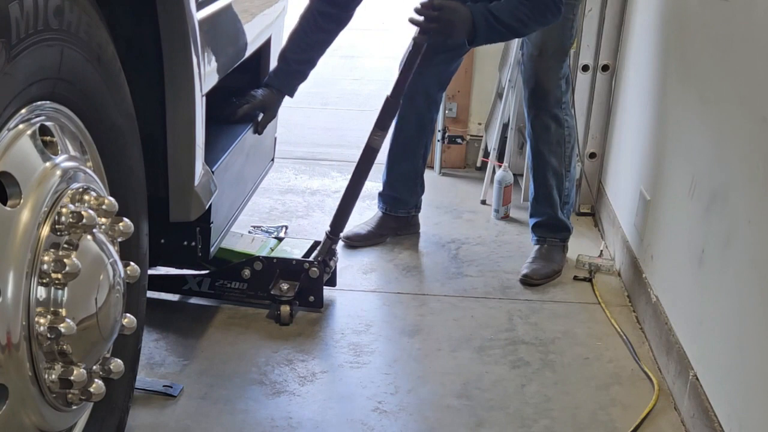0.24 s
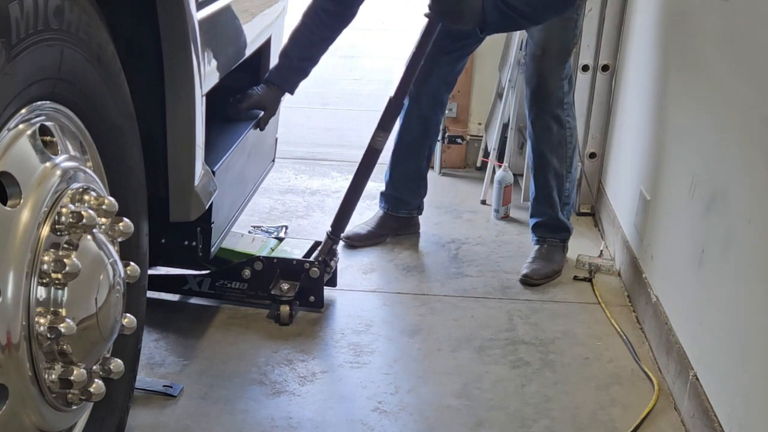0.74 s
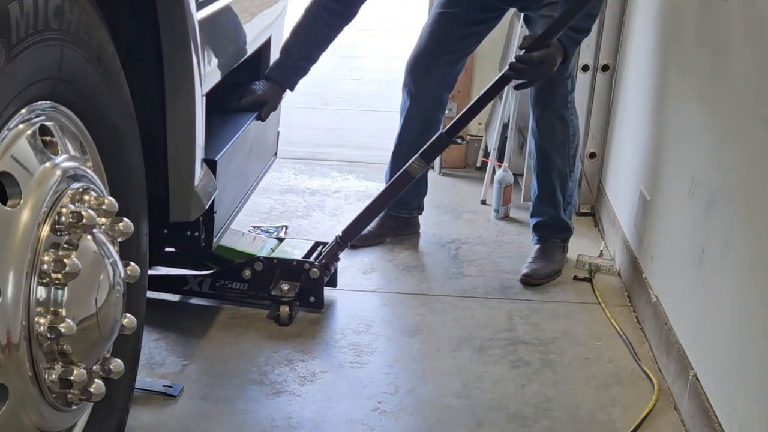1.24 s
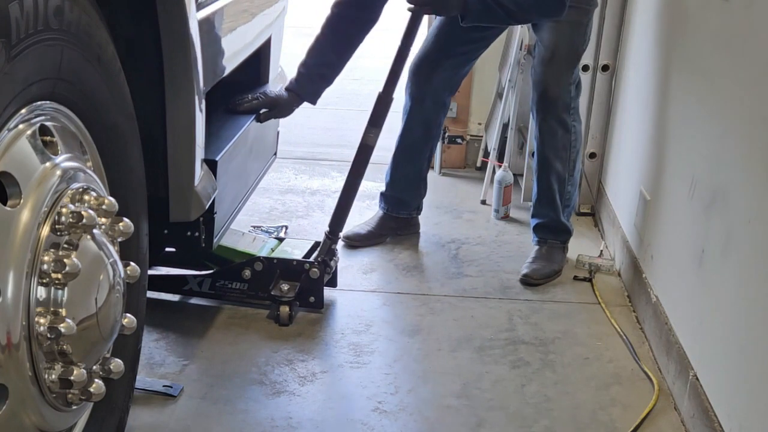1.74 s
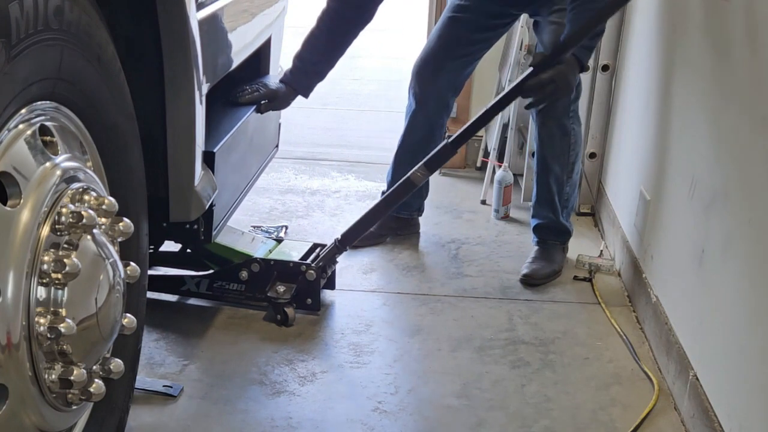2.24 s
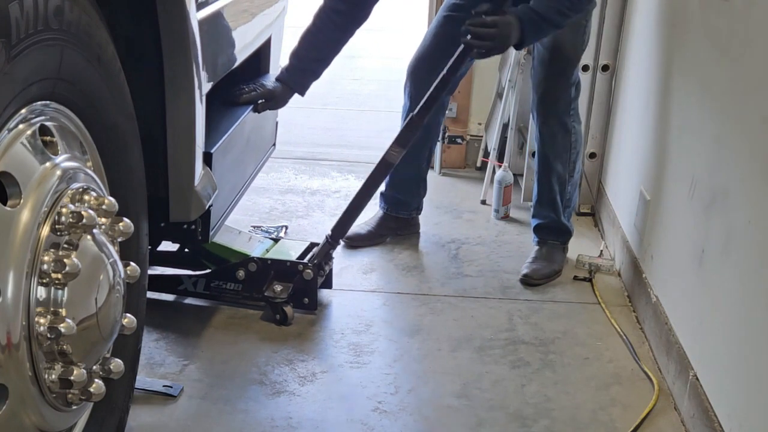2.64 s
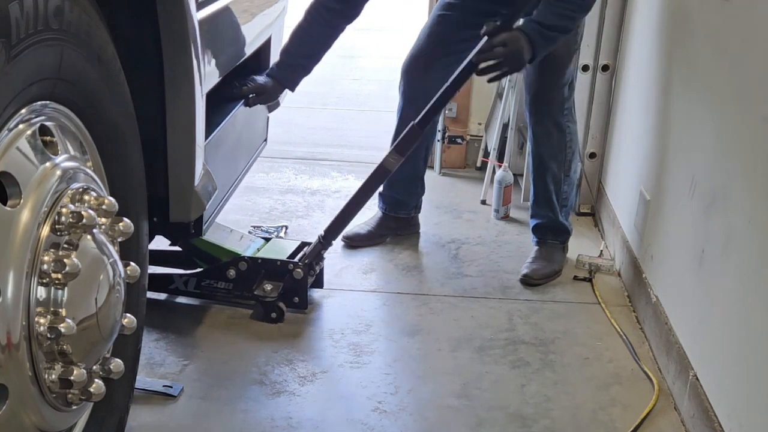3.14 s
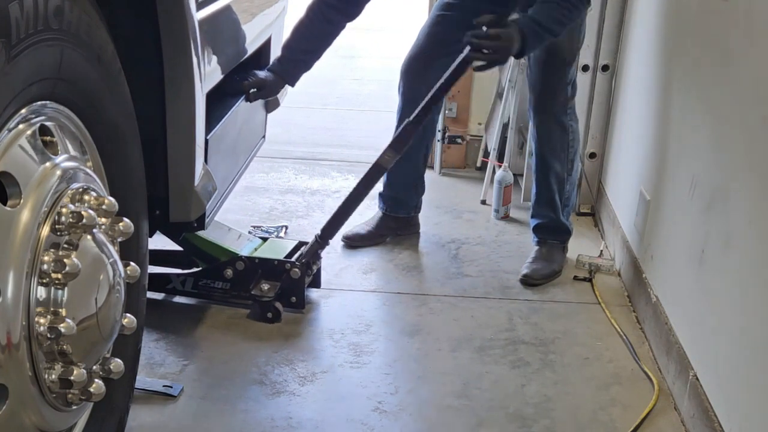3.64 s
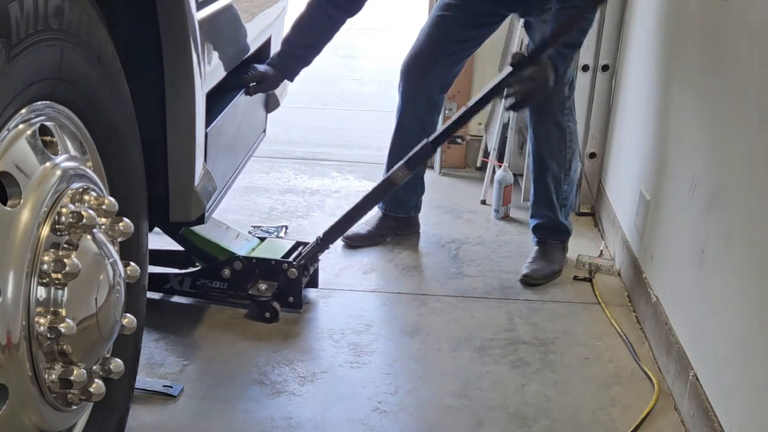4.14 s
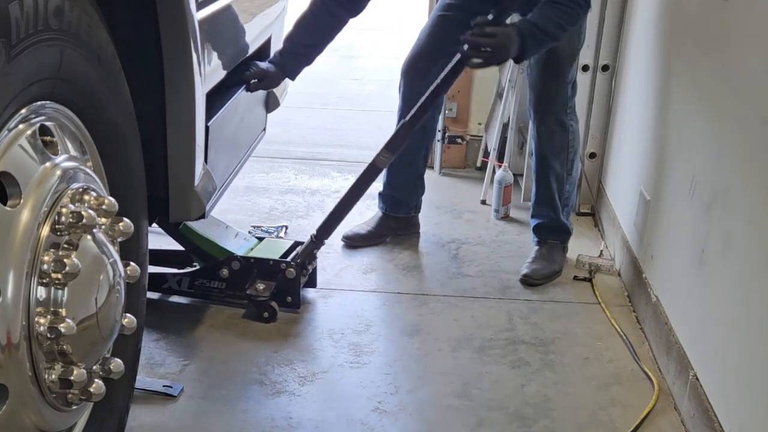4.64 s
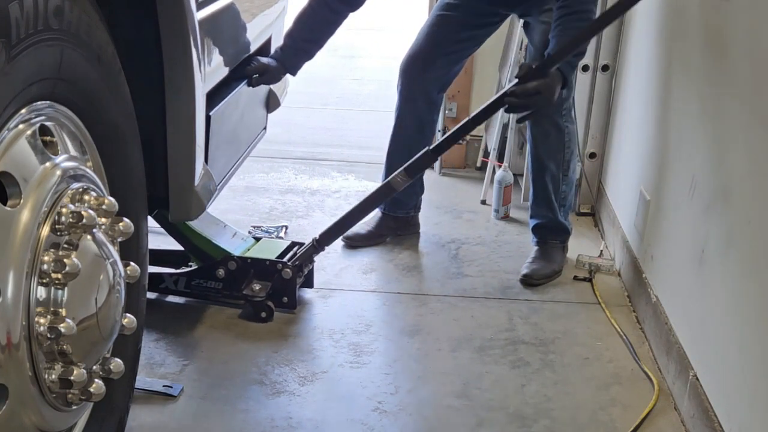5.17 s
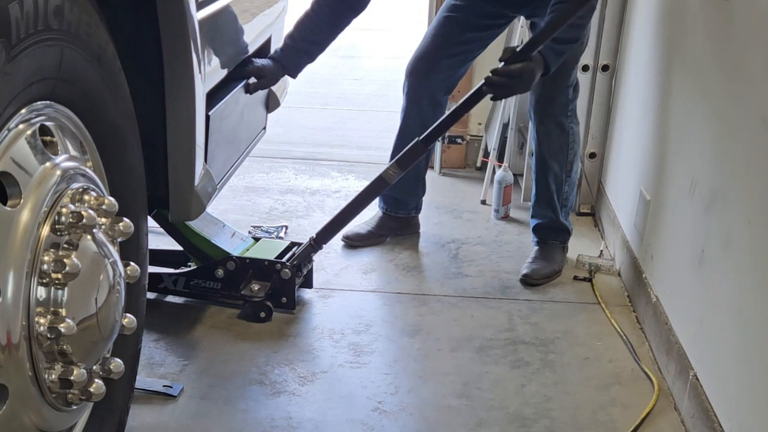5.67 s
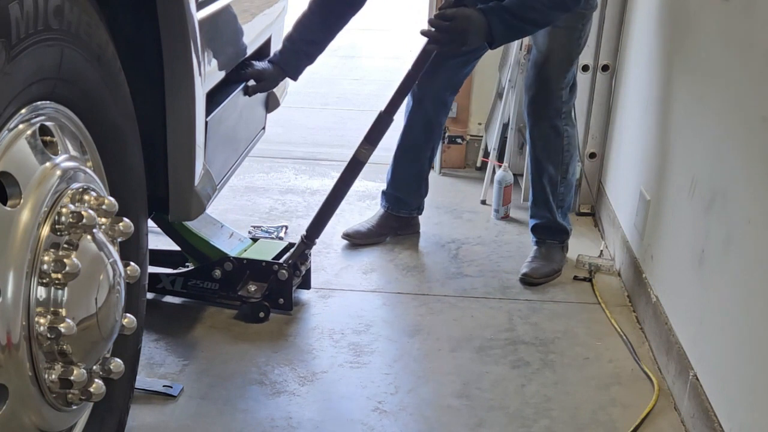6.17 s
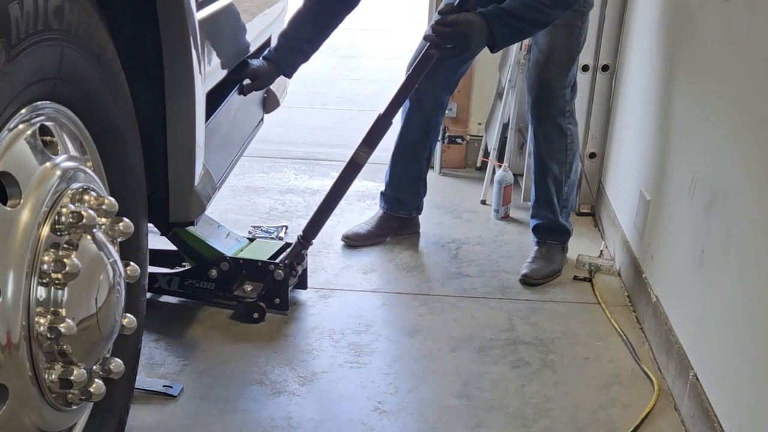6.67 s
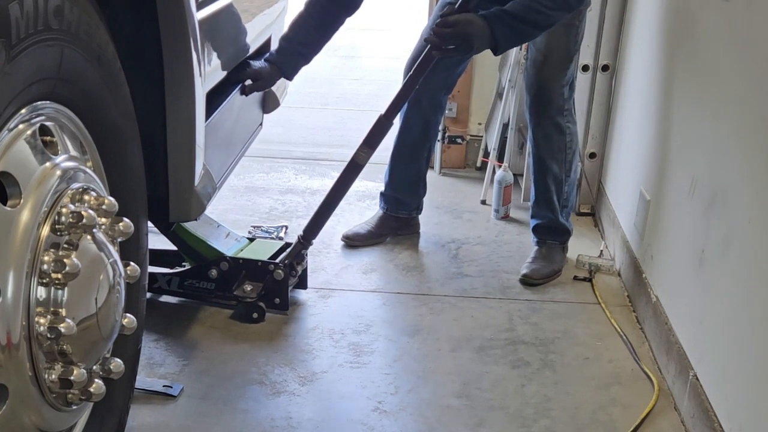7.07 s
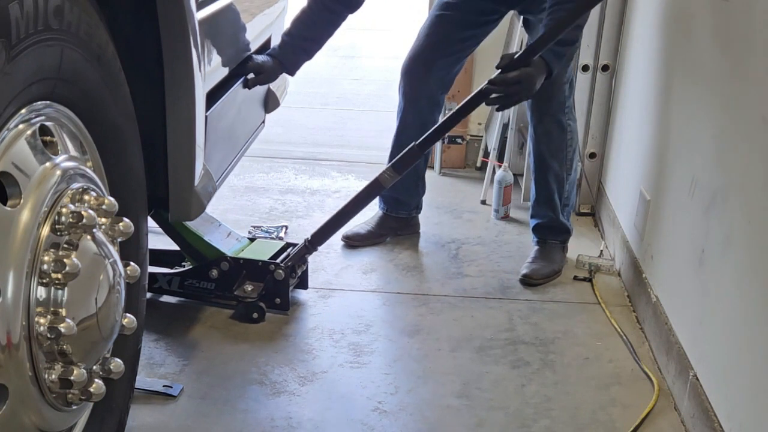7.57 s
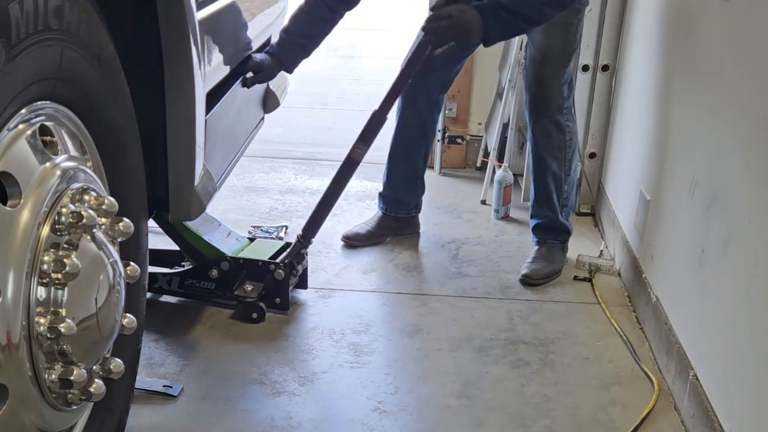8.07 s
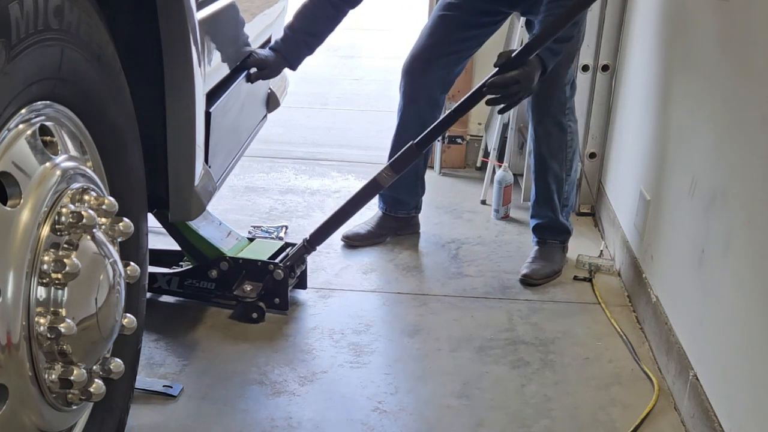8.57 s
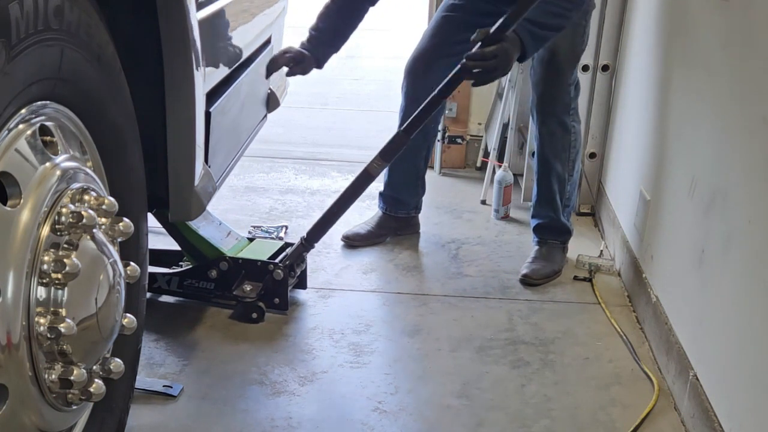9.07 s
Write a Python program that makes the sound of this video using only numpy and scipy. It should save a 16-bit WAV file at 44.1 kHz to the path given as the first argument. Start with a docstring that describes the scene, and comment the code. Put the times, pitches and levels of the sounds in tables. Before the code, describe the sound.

A trolley jack is pumped under a large vehicle's steel side box, heard closely in stereo with short garage echoes. Quiet room air and a faint hum lie beneath. A handle clunk at 0.6 s leads to a clack, then a thud, scrape and brief low groan around 1.1. A bright, hard clack comes at 1.9, then ticks, knocks and a small valve ping near 3. After a clunk at 4.0, scraping swells into a huge, clipped metal slam at 4.3, booming low with a short rattle and shudder. Oil whistles faintly; thuds and clunks cluster around 5, with another ping at 5.2. From 5.9 a drag grows, cracking sharply near 6.3 with a rough squeal and falling groans to 6.6. A lower hum fades in. Softer thuds, a clunk at 8.1, a dull thud at 8.3, faint whistle, swishes and ticks finish by 9.2.

```python
"""A trolley jack is pumped in a garage, under the steel side box of a large vehicle, before two close microphones.
The handle clunks in its socket and its linkage clacks, as bursts of tiny contacts ringing through steel.
Its spring ticks, a valve pings, oil whistles and strokes swish, as scratched resonances, gliding tones and hiss.
The box thuds, cracks, scrapes, groans and once slams down with swelling panel modes; the vehicle shudders.
Behind lie room air and a faint hum, joined late by a lower one; noise echoes give the garage."""
import sys
import numpy as np
from scipy import signal
from scipy.fft import rfft, irfft
from scipy.io import wavfile

SR = 44100
rng = np.random.default_rng(int(sys.argv[2]) if len(sys.argv) > 2 else 0)


def to_wav(sig):
    """Store sig (one row per channel, or 1-D mono) as 16-bit WAV at the path in sys.argv[1].

    Samples outside -1..1 are clipped; the rate is SR.
    """
    pcm = np.clip(np.atleast_2d(sig), -1, 1) * 32767
    pcm = np.round(pcm).astype(np.int16)
    wavfile.write(sys.argv[1], SR, pcm.T)  # frames by channels


N = 410571

# Blow levels are before each source's trim; bass and treble are relative to the middle band.
# The handle takes up its play: (time [s], middle level [dB], bass [dB], treble [dB])
HANDLE_CLUNKS = [(0.0, -58, -11, -1.5), (0.636, -36, -5.5, -16), (2.395, -49.5, -2, -17),
                 (2.969, -36, -6, -18), (3.961, -35.5, -10, -16.5), (4.917, -36.5, -3.5, -9.5),
                 (5.094, -49, 6.5, -8.5), (7.566, -51.5, -5.5, -15), (8.079, -38, -11, -19),
                 (8.498, -51, -1, -14.5)]
# Sharp clacks of the pump linkage: (time [s], middle level [dB], bass [dB], treble [dB])
LINKAGE_CLACKS = [(0.912, -39, -20, -10.5), (1.155, -46.5, 12.5, -13.5), (1.861, -32, -3, -2.5),
                  (2.414, -39.5, -17, -11), (2.844, -54, -6, -20), (3.04, -43.5, 2, -5),
                  (3.325, -57.5, 4.5, -6), (3.438, -42, -1.5, -9.5)]
# The box gives under the load: (time [s], middle level [dB], bass [dB], treble [dB])
BOX_THUDS = [(1.084, -34, 4.5, -20.5), (4.211, -43, 8, -13.5), (4.49, -38.5, 5.5, -10.5),
             (4.861, -53, 15.5, -38), (5.0, -39, 8.5, -23), (5.2, -30.5, -3, -19.5), (5.24, -39, 8, -20),
             (6.066, -48, 6, -34), (6.551, -44.5, 16.5, -42), (6.904, -46, 5, -38), (7.121, -47, -11, -44),
             (8.346, -38, -4, -27.5)]
# Steel edges slip free: (time [s], middle level [dB], bass [dB], treble [dB])
EDGE_CRACKS = [(6.252, -45, 0.5, -8.5), (6.32, -46.5, 1, -3), (6.374, -31.5, -2.5, -1),
               (6.678, -38.5, -2.5, -3), (7.194, -47, -24, -43)]
# The handle's second, softer knock, and its colour against the first
REBOUND_S, REBOUND_DB = 0.03, -8
REBOUND_BASS_DB, REBOUND_TREBLE_DB = 1, 2

# Broad colours of the struck parts: (frequency [Hz], relative level per Hz [dB])
SOCKET_COLOUR = [(40, -2), (120, -5.5), (270, -12.5), (470, -6.5), (650, -10), (900, -10.5), (1250, -9),
                 (1700, -12.5), (2400, -23), (3500, -24.5), (5500, -33.5), (15000, -60.5)]
LINKAGE_COLOUR = [(24, -37), (40, -2), (87, 0), (241, -17.5), (359, -5), (535, -16.5), (1910, -17.5),
                  (2450, -12.5), (8960, -26), (15500, -40.5)]
BOX_COLOUR = [(15, -28), (25, -0.5), (78, 0), (253, -8.5), (349, -14), (557, -14), (981, -19),
              (6070, -59.5), (9000, -55.5), (11700, -100), (19800, -120)]
EDGE_COLOUR = [(40, -0.5), (350, -12.5), (520, -6), (1500, -4.5), (1900, -7), (2300, -19), (3300, -23.5),
               (4800, -18.5), (7600, -20.5), (9000, -29.5), (9900, -47), (12000, -30), (14000, -49)]
# Their resonances: (frequency [Hz], width [Hz], lift [dB])
SOCKET_MODES = [(465.8, 10, 12), (632, 45, 13), (2320, 270, 8.5)]
LINKAGE_MODES = [(630, 35, 15), (1370, 180, 5.1), (2447, 46, 2.9), (3020, 56, 4.6), (3606, 180, 5.3),
                 (4490, 180, 5.6), (5420, 170, 8.6), (6270, 55, 6), (7640, 100, 7.5)]
BOX_MODES = [(59.4, 11, 11.1), (116, 25, 4.1), (172.3, 11, 8.3), (345, 10, 15), (466, 16, 13)]
EDGE_MODES = [(1540, 26, 3.4), (1830, 15, 1.75), (4690, 130, 11.3)]

# Return spring ticks as it stretches: (time [s], peak before trim [dB])
SPRING_TICKS = [(1.4003, -56.5), (2.4724, -53), (3.481, -52), (4.53, -52), (5.683, -50.5), (7.6637, -54),
                (9.175, -56.5)]
# Spring resonances: (frequency [Hz], width [Hz], lift [dB])
SPRING_MODES = [(5370, 90, 12.5), (8400, 100, 22.5), (9200, 110, 23), (8760, 210, 20.5), (11600, 360, 23.5),
                (12150, 250, 11.5)]
TICK_LEAD_S, TICK_LEAD_DB = 0.025, -10.5  # a tick leads each clunk and follows its strength
TICK_AGAIN_S, TICK_AGAIN_DB = 0.08, -9.5  # the second tick of a pair
# Valve pings: (time [s], peak before trim [dB])
VALVE_PINGS = [(3.1154, -39), (5.186, -35)]
# Valve resonances: (frequency [Hz], width [Hz], lift [dB])
VALVE_MODES = [(6160, 150, 24.4), (12440, 92, 41)]
# Oil in the pump: (loudest at [s], pitch then [Hz], glide [Hz/s], level [dB], swell [s], fade [dB/s])
OIL_WHISTLES = [(4.6, 4580, -450, -71.5, 0.12, 29), (8.7, 4480, 546.5, -80, .45, 39.5)]
# Soft rushes of the strokes: (time [s], level [dB], half length [s])
STROKE_SWISHES = [(0.193, -64.5, 0.16), (1.412, -62.5, .13), (5.613, -54.5, 0.034), (8.737, -63, 0.035),
                  (8.991, -65, 0.039)]
# Colour of the swishes: (frequency [Hz], relative level per Hz [dB])
SWISH_COLOUR = [(300, 0), (1500, 6.5), (4000, 4.5), (8800, 1.5), (10000, -7.5), (15500, 1.5)]

SLAM_S = 4.2835  # the box shifts on the saddle
# The slam's loudest panel mode, one row: (frequency [Hz], peak before room [dB], time to peak [s])
LOUDEST_PANEL_MODE = (139, .7, .016)
# Other panel modes and the vehicle's slow rock: (frequency [Hz], peak before room [dB], time to peak [s])
PANEL_MODES = [(33, -27, 0.099), (59.2, -20.5, 0.038), (124, -21, .026), (200.2, -16, 0.035),
               (297, -12, 0.01), (455, -12.5, 0.0059), (410, -6.5, 0.0014), (587, -8.5, 0.0046),
               (1040, -17.5, .003)]
# Colour of the slam's rattle: (frequency [Hz], relative level per Hz [dB])
RATTLE_COLOUR = [(60, -23.5), (300, -2.5), (700, -4.5), (1100, -7.5), (2000, -17.5), (5500, -18.5),
                 (9000, -32), (13000, -40), (15500, -42.5)]
# Rattle resonances: (frequency [Hz], width [Hz], lift [dB])
RATTLE_MODES = [(4785, 12, 15.5), (13400, 80, 19)]
# Steel drags on steel: (slides free at [s], level [dB], swell [s], fade [dB/s])
STEEL_SCRAPES = [(1.108, -36, 0.062, 102), (4.28, -28.5, 0.14, 69.5), (6.31, -37.5, 0.42, 28.5)]
# Colour of the dragging: (frequency [Hz], relative level per Hz [dB])
DRAG_COLOUR = [(60, -11.5), (150, 14.5), (350, -0.5), (750, 4.5), (1500, -14), (2800, -18.5), (6000, -29.5),
               (14000, -44.5)]
# Stick-slip tones: (loudest at [s], pitch then [Hz], glide [Hz/s], level [dB], swell [s], fade [dB/s])
BOX_GROANS = [(1.11, 341, -13.5, -23, .03, 186), (6.44, 342, -31, -33.5, 0.11, 136),
              (6.55, 265, -10, -40.5, 0.13, 30)]
# Rough squeal: (loudest at [s], pitch then [Hz], glide [Hz/s], level [dB], swell [s], fade [dB/s])
STRAIN_SQUEALS = [(6.3, 2780, -100, -60.5, 0.17, 50)]

SHUDDER_REST_DB, SHUDDER_SLAM_DB = -51, -32  # floor, and the part added by the slam
SHUDDER_KICK_DB = -13.5  # against the bass of a blow
SHUDDER_SWELL_S, SHUDDER_FADE_DB_PER_S = 0.043, 26
# Colour of the vehicle's shudder: (frequency [Hz], relative level per Hz [dB])
SHUDDER_COLOUR = [(15, -13.5), (30, -18), (45, -0.5), (57, 4), (75, 1.5), (170, -20), (600, -61)]

# Faint hum present throughout, one row: (frequency [Hz], level [dB])
ROOM_HUM = (290.8, -64)
# Lower hum that joins it, one row: (frequency [Hz], level [dB])
LATE_HUM = (134.4, -51.5)
HUM_RISE_AT_S, HUM_RISE_S = 6.34, 1.0  # when the lower hum starts, and how long it takes to grow
# Colour of the room air: (frequency [Hz], relative level per Hz [dB])
AIR_COLOUR = [(20, -29), (55, -2.5), (140, -4.5), (230, -20), (400, -24.5), (950, -30), (2200, -38),
              (4500, -42.5), (8800, -55.5), (15500, -87.5)]
AIR_DB = -51.5
# Decay of the garage: (frequency [Hz], time to fall 60 dB [s])
GARAGE_DECAY = [(50, 0.84), (130, 0.5), (250, 1.22), (500, 0.49), (1500, 0.74), (4000, 0.58), (8000, 0.42),
                (15000, 0.23)]

T = np.arange(N) / SR
AGE = np.arange(SR) / SR  # one second, for single events
HZ = np.fft.rfftfreq(2 * SR, 1 / SR)


def handle_clunks():
    """The handle knocks in its socket and rebounds once, more softly."""
    rebounds = [(s + REBOUND_S, db + REBOUND_DB, bass + REBOUND_BASS_DB, treble + REBOUND_TREBLE_DB)
                for s, db, bass, treble in HANDLE_CLUNKS]
    return blows(HANDLE_CLUNKS + rebounds, body(SOCKET_COLOUR, SOCKET_MODES), wet_db=1, lag_ms=0.28,
                 level_db=3.5, contact_s=0.0073, lead_s=0.0087, bite=1.45, early_db=2.0)


def linkage_clacks():
    """The pump linkage meets in short, sharp contacts, brighter when harder."""
    return blows(LINKAGE_CLACKS, body(LINKAGE_COLOUR, LINKAGE_MODES), wet_db=1.0, lag_ms=0.264,
                 level_db=3.0, contact_s=0.0036, lead_s=0.0066, bite=2.1, early_db=3, hardness=0.31)


def spring_ticks():
    """The return spring ticks just before each clunk, and in pairs as it stretches."""
    before_clunks = [(s - TICK_LEAD_S, db + TICK_LEAD_DB) for s, db, _, _ in HANDLE_CLUNKS]
    again = [(s + TICK_AGAIN_S, db + TICK_AGAIN_DB) for s, db in SPRING_TICKS]
    rows = before_clunks + SPRING_TICKS + again
    return tinks(rows, SPRING_MODES, level_db=1, wet_db=2.0, contact_s=0.012)


def valve_pings():
    """A brief scratch rings the valve's two high resonances."""
    return tinks(VALVE_PINGS, VALVE_MODES, level_db=-6, wet_db=1.5, contact_s=0.0031)


def oil_whistles():
    """Oil whistles faintly in the pump, its pitch gliding."""
    return wavering(OIL_WHISTLES, flutter=0.006, width_hz=120, rough=2.5)


def stroke_swishes():
    """The strokes give brief soft rushes of hiss."""
    level = sum(amp(db) * np.exp(-0.5 * ((T - s) / half) ** 2) for s, db, half in STROKE_SWISHES)
    return diffuse(N, SWISH_COLOUR) * level


def box_thuds():
    """The steel box gives under the load in dull, slower contacts."""
    return blows(BOX_THUDS, body(BOX_COLOUR, BOX_MODES), wet_db=2, lag_ms=-0.0397,
                 level_db=-0.5, contact_s=0.016, lead_s=0.013, bite=2.48)


def edge_cracks():
    """Steel edges slip free in short contacts, much brighter when harder."""
    return blows(EDGE_CRACKS, body(EDGE_COLOUR, EDGE_MODES), wet_db=6, lag_ms=-0.042, level_db=-0.5,
                 contact_s=0.0039, lead_s=0.0046, bite=1.8, early_db=1.5, hardness=0.82)


def slam(crash_db=-21, crash_s=0.0081):
    """The box jumps on the saddle with a rattle; its panel modes swell and die."""
    boom = np.zeros(SR)
    for hz, db, rise in [LOUDEST_PANEL_MODE] + PANEL_MODES:
        envelope = (AGE / rise * np.exp(1 - AGE / rise)) ** 2.1
        boom -= amp(db) * envelope * np.sin(2 * np.pi * hz * AGE)
    rattle = rng.standard_normal(SR) * np.exp(-AGE / crash_s)
    rattle = irfft(rfft(rattle, 2 * SR) * body(RATTLE_COLOUR, RATTLE_MODES))[:SR]
    crash = garage(rattle, 0, -0.068)
    out = np.zeros((2, N))
    add(out, SLAM_S, garage(boom, -13, -0.046, early_db=-19.0))
    add(out, SLAM_S - 0.002, amp(crash_db) * crash / crash[:, :SR // 20].std())
    return out


def scrape(slips_per_s=300, spread_db=2.5):
    """Uneven small slips shake the box, growing with the strain and dying away once it slides free."""
    slips = (rng.random(N) < slips_per_s / SR) * rng.standard_normal(N) * amp(spread_db * drift(25))
    response = garage(irfft(body(DRAG_COLOUR, BOX_MODES))[:SR], 0, -0.045)
    response = response / np.linalg.norm(response[0])
    strain = sum(amp(db) * swell(s, swell_s, fade) for s, db, swell_s, fade in STEEL_SCRAPES)
    drive = unit(slips) * strain
    return signal.fftconvolve(drive[None], response, axes=1)[:, :N]


def groans():
    """Stick-slip makes the box sound unsteady, falling low tones."""
    return wavering(BOX_GROANS, flutter=0.0196, width_hz=23, rough=0.73)


def squeals():
    """As the strain peaks, a high tone is blurred by strong random modulation."""
    return wavering(STRAIN_SQUEALS, flutter=0.0065, width_hz=150, rough=4)


def shudder():
    """The bass of clunks, clacks and thuds, and the slam, set the vehicle's body shuddering until it settles."""
    kicks = [(s, db + bass + SHUDDER_KICK_DB)
             for s, db, bass, _ in HANDLE_CLUNKS + LINKAGE_CLACKS + BOX_THUDS]
    kicks.append((SLAM_S, SHUDDER_SLAM_DB))
    power = amp(SHUDDER_REST_DB) ** 2
    for s, db in kicks:
        envelope = swell(s + SHUDDER_SWELL_S, SHUDDER_SWELL_S, SHUDDER_FADE_DB_PER_S)
        power = power + (amp(db) * envelope) ** 2
    return diffuse(N, SHUDDER_COLOUR) * np.sqrt(power)


def background():
    """Room air is shaped noise; a wavering hum lies over it and a lower one grows in late."""
    risen = np.clip((T - HUM_RISE_AT_S) / HUM_RISE_S, 0, 1)
    air = diffuse(N, AIR_COLOUR) * amp(AIR_DB)
    return air + hum(*ROOM_HUM) + risen * hum(*LATE_HUM)


def hum(hz, db, waver=0.22):
    """A sine whose phase and level waver slowly."""
    tone = np.sin(2 * np.pi * hz * T + waver * drift(2.5))
    return amp(db) * np.sqrt(2) * tone * (1 + waver * drift(6.2))


def blows(rows, response, wet_db, lag_ms, level_db, contact_s, lead_s, bite, early_db=0, hardness=0):
    """Parts slide together, meet and chatter; each blow's level and hardness set its bass and treble."""
    out = np.zeros((2, N))
    edges_hz = [(22, 220), (220, 2200), (2200, 17000)]
    bands = [signal.butter(3, edges, "band", fs=SR, output="sos") for edges in edges_hz]
    onset = SR // 25  # sample at which the parts meet
    since = AGE - AGE[onset]
    chatter = np.exp(-abs(since) / np.where(since < 0, lead_s, contact_s))
    chatter *= np.where(since < 0, 0.3, 1)  # the slide before is weaker
    for s, db, bass, treble in rows:
        contacts = rng.random(SR) < 2000 / SR  # about 2000 a second
        force = rng.standard_normal(SR) * rng.uniform(0.45, 1.3, SR) * contacts * chatter
        force[onset] = bite
        octaves_up = np.log2(np.maximum(HZ / 3500, 1))
        tilt = amp(hardness * (db + treble + 35.0) * octaves_up)
        struck = irfft(rfft(force, 2 * SR) * response * tilt)[:SR]
        sound = garage(struck, wet_db, lag_ms, early_db)
        # each band is set to its level over a span after the onset, longer in the bass
        for band, level, span in zip(bands, (bass, 0, treble), (SR // 10, onset, onset)):
            part = signal.sosfilt(band, sound)
            part *= amp(db + level + level_db) / part[:, onset:onset + span].std()
            add(out, s - AGE[onset], part)
    return out


def tinks(rows, rings, level_db, wet_db, contact_s):
    """A small hard part is flicked: a brief scratch excites its high resonances."""
    out = np.zeros((2, N))
    response = body([(300, -18.5), (4000, 15.0), (16000, 0)], rings)  # colour: (frequency [Hz], level [dB])
    for s, db in rows:
        flick = rng.standard_normal(SR) * np.exp(-AGE / contact_s)
        sound = garage(irfft(rfft(flick, 2 * SR) * response)[:SR], wet_db, 0.309)
        add(out, s, amp(db + level_db) * sound / abs(sound).max())
    return out


def wavering(rows, flutter, width_hz, rough):
    """Tones glide within a second of their peak, made unsteady by random pitch and modulation."""
    out = np.zeros(N)
    for s, hz, glide, db, swell_s, fade in rows:
        pitch = (hz + glide * np.clip(T - s, -1, 1)) * (1 + flutter * drift(31.4))
        phase = 2 * np.pi * np.cumsum(pitch) / SR
        tone = (1 + rough * drift(width_hz)) * np.sin(phase)
        tone += rough * drift(width_hz) * np.cos(phase)
        out += amp(db) * unit(tone) * swell(s, swell_s, fade)
    return out


def body(spectrum, rings):
    """The causal, minimum-phase response of a hard part: a broad colour with narrow resonances."""
    gain = amp(np.maximum(read(spectrum, HZ), -90))
    lifts = sum((amp(db) - 1) / np.hypot(1, 2 * (HZ - hz) / width) ** 2 for hz, width, db in rings)
    gain = gain * (1 + lifts)
    both_sides = np.r_[gain, gain[-2:0:-1]]
    phase = -signal.hilbert(np.log(np.maximum(both_sides, 1e-6))).imag[:len(HZ)]
    return gain * np.exp(1j * phase)


def garage(x, wet_db, lag_ms, early_db=0, early_s=0.02):
    """One second of a sound reaches the nearer microphone first, then returns from floor, wall and room."""
    noise = diffuse(SR)
    hz, t, z = signal.stft(noise, SR, nperseg=256)
    decay = amp(-60 * t / read(GARAGE_DECAY, hz)[:, None])
    tail = signal.istft(z * decay, SR, nperseg=256)[1][:, :SR]
    early = diffuse(SR) * np.exp(-AGE / early_s)
    arrival = np.clip(AGE / 0.0014 - 1, 0, 1)  # echoes start after 1.4 ms
    echoes = (unit(tail) + amp(early_db) * unit(early)) * arrival / np.sqrt(SR)
    delay_s = np.array([[max(lag_ms, 0)], [max(-lag_ms, 0)]]) / 1000  # positive lag: right is nearer
    direct = np.exp(-2j * np.pi * HZ * delay_s)
    return irfft(rfft(x, 2 * SR) * (direct + amp(wet_db) * rfft(echoes, 2 * SR)))[:, :SR]


def diffuse(size, spectrum=((1, 0),), alike_hz=650):
    """Noise from all round at two close microphones: alike in the bass, unrelated above."""
    hz = np.fft.rfftfreq(size, 1 / SR)
    mid, side = rfft(rng.standard_normal((2, size)))
    alike = 1 / (1 + (hz / alike_hz) ** 2)
    mid, side = mid * np.sqrt(1 + alike), side * np.sqrt(1 - alike)
    return unit(irfft(np.array([mid + side, mid - side]) * amp(read(spectrum, hz)), size))


def swell(peak_s, swell_s, fade_db_per_s):
    """An envelope that grows steadily to its peak and then dies away."""
    rise = np.clip(1 + (T - peak_s) / swell_s, 0, 1)
    return rise * amp(-fade_db_per_s * np.maximum(T - peak_s, 0))


def drift(rate_hz):
    """Slow chance of unit size: noise with its faster motion removed."""
    lowpass = np.exp(-(np.fft.rfftfreq(N, 1 / SR) / rate_hz) ** 2)
    return unit(irfft(rfft(rng.standard_normal(N)) * lowpass, N))


def add(mix, s, sound):
    """Mixes a sound in at its time, trimmed to the scene."""
    start = round(s * SR)
    sound, part = sound[:, max(-start, 0):], mix[:, max(start, 0):]
    part[:, :sound.shape[1]] += sound[:, :part.shape[1]]


def read(points, hz):
    """A spectrum joined by straight lines over log frequency."""
    f, value = np.transpose(points)
    return np.interp(np.log(hz + 1), np.log(f + 1), value)


def unit(x):
    """Scaled to rms 1."""
    return x / np.sqrt(np.mean(x ** 2) + 1e-30)


def amp(db):
    """Decibels to gain."""
    return 10 ** (np.asarray(db) / 20)


def scene():
    """The jack, the box it lifts, and the garage around them, slightly stronger at the right microphone."""
    jack = handle_clunks() + linkage_clacks() + spring_ticks() + valve_pings()
    jack += oil_whistles() + stroke_swishes()
    box = box_thuds() + edge_cracks() + slam() + scrape()
    box += groans() + squeals() + shudder()
    return (jack + box + background()) * amp([[-0.3], [0.3]])


def record(dry):
    """The recorder clips at full scale, as when the slam overloads it, then limits the band."""
    clipped = np.clip(dry, -1, 1)
    lowpass = signal.firwin(511, 15850, window=("kaiser", 9), fs=SR)  # cut in Hz
    return signal.oaconvolve(clipped, lowpass[None], "same")


dry = scene()
out = record(dry)
to_wav(out)
```